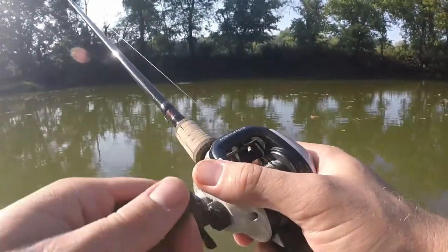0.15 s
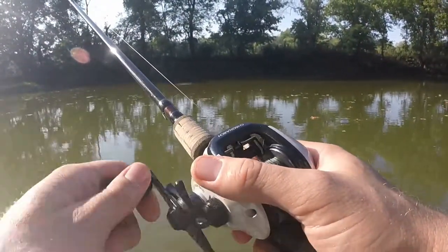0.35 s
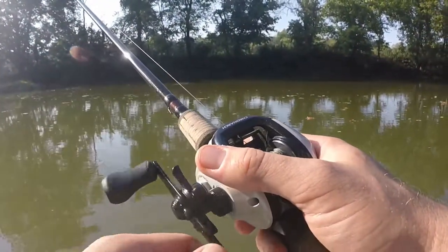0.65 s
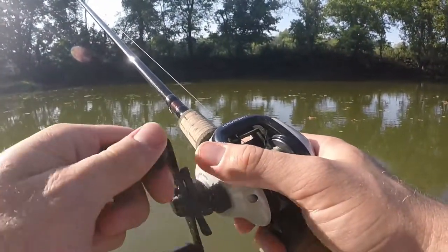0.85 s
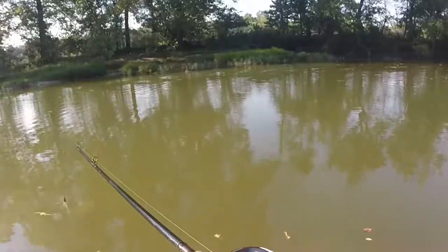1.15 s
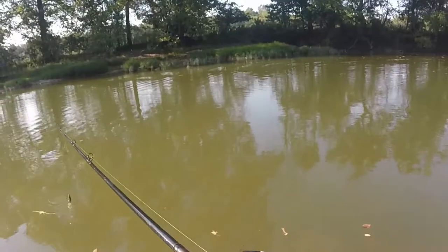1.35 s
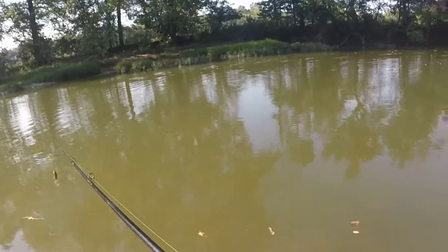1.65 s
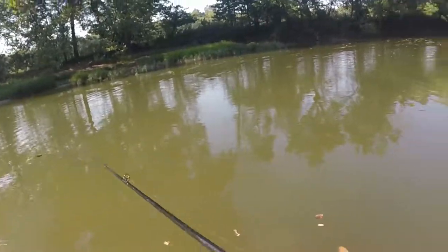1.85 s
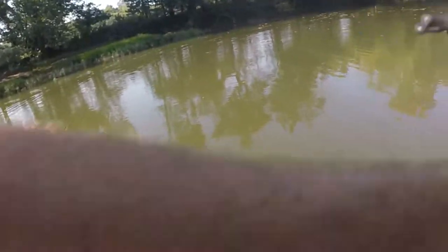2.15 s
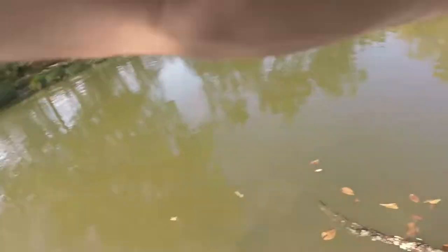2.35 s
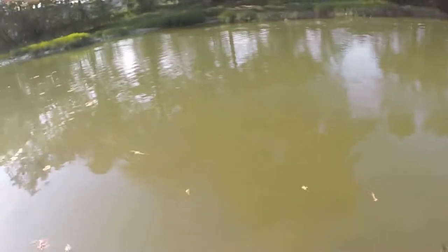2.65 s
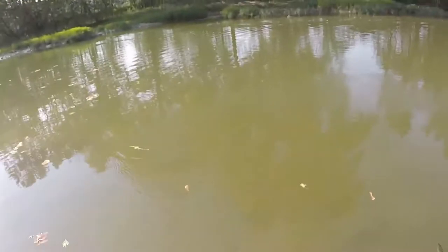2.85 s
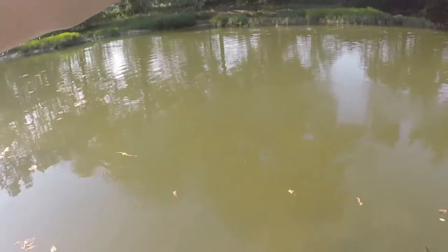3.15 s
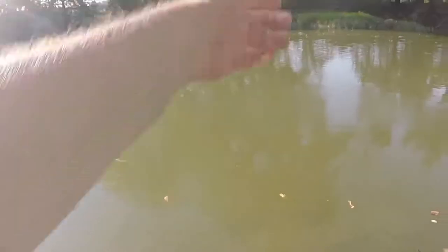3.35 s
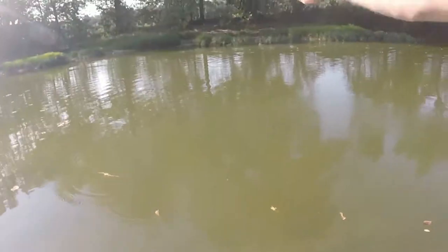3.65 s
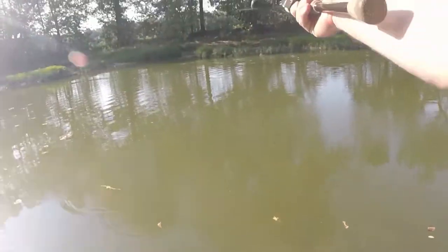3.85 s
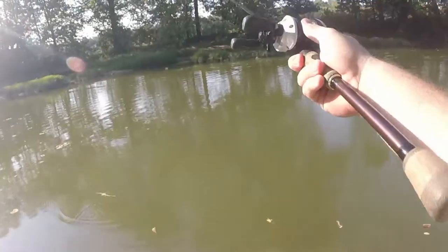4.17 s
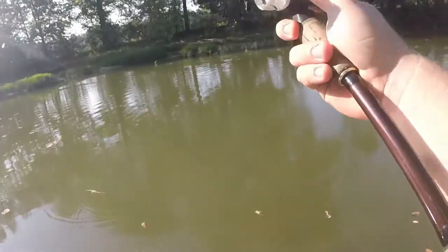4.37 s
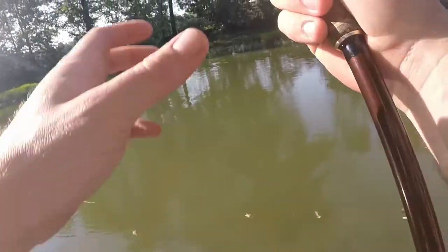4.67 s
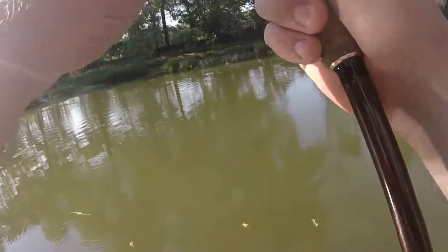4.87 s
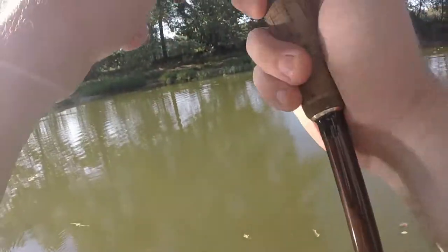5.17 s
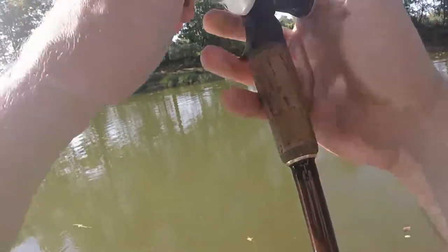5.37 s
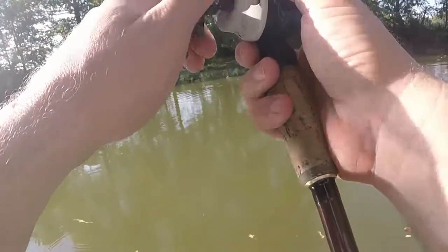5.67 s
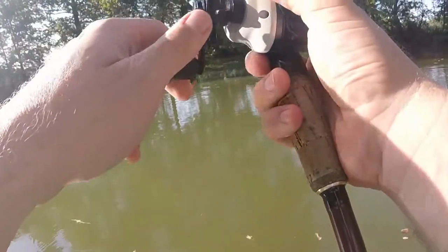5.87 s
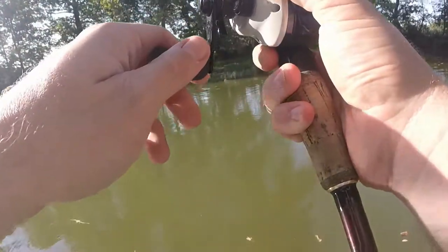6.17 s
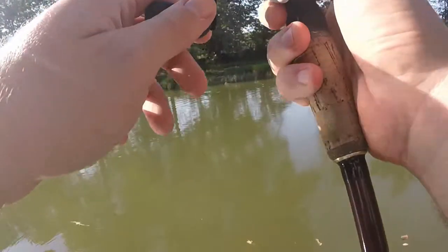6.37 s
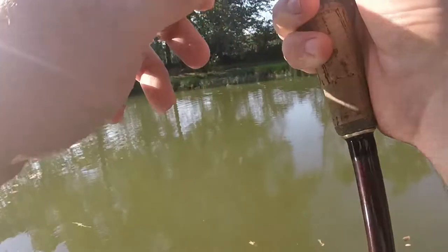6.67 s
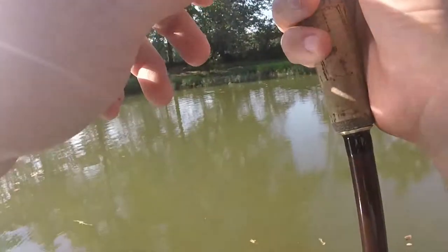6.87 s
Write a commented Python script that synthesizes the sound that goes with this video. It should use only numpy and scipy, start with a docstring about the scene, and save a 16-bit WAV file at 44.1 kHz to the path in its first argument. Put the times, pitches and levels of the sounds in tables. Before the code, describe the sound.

A fishing reel clicks sharply, then a burst of clattering bumps and cloth rub on the microphone, and the reel clicks again beside a quiet pond.

```python
"""Insects hiss near 8 kHz over the quiet floor of a still pond, while cloth rubs close on the microphone's case.
A small camera in a plastic case is strapped to an angler casting a rod: cloth, arm and buckle strike the
case, which rings in its own modes. The reel's clutch clicks off and on, each click a burst of ringing modes.
The line hisses faintly as filtered noise; far off the lure plops, a low sine gliding up.
Last, a bird gives two thin, fluttering near-sine notes."""
import sys
import numpy as np
from scipy import signal
from scipy.fft import rfft, irfft
from scipy.io import wavfile
from scipy.ndimage import uniform_filter1d

SR = 44100
rng = np.random.default_rng(int(sys.argv[2]) if len(sys.argv) > 2 else 0)


def volts(x):
    """Linear amplitude factor 10**(x/20) for a level x in dB, scalar or array-like."""
    e = np.asarray(x, float) / 20
    return 10 ** e


def pcm_store(signal):
    """Save signal as 16-bit PCM."""
    levels = np.round(np.clip(np.atleast_2d(signal), -1, 1) * 32767)
    wavfile.write(sys.argv[1], SR, levels.astype(np.int16).T)


N = 309617
T = np.arange(N) / SR  # seconds

# Distant air over the pond. Each row: frequency [Hz], relative density [dB per Hz].
AIR_SPECTRUM = [(12, -15.5), (20, 6), (70, 5), (534, -4.5), (1070, -4), (1270, -12), (6720, -23),
                (7950, -21.5), (10200, -34.5), (14300, -42.5), (15500, -72)]
# Insects across the water. Each row: centre [Hz], width [Hz], rms level before wavering [dB].
INSECT_BANDS = [(7950, 580, -71.5), (13700, 900, -104.5)]
# Cloth moving on the case. Each row: start [s], sliding speed as level [dB], pressure as level [dB].
CLOTH_MOVES = [(0.0, -65, -52), (0.116, -56, -52), (0.316, -68.5, -56), (0.72, -68, -63),
               (1.09, -74, -64.5), (1.3, -65.5, -58.5), (1.55, -59, -56), (1.9, -63, -55),
               (1.99, -53.5, -53), (2.15, -47, -49), (2.3, -46, -47), (2.46, -42, -40.5), (2.541, -48, -47),
               (2.566, -41, -32.5), (2.62, -39.5, -37), (2.67, -43.5, -39.5), (2.71, -39, -40),
               (2.76, -53, -40.5), (2.95, -57, -49), (3.08, -62, -58.5), (3.35, -54.5, -54.5),
               (3.6, -47.5, -48), (3.75, -55, -56.5), (3.9, -51.5, -54.5), (3.96, -62.5, -60),
               (4.5, -65.5, -61.5), (4.81, -62.5, -59), (5.17, -68.5, -62), (5.89, -70, -62),
               (6.4, -76, -74), (7.02, -77, -82)]
# Modes of the plastic case. Each row: frequency [Hz], relative level [dB], ring time t60 before damping [s].
CASE_MODES = [(235, -5, .04), (310, -4, .05), (470, -1, .05), (570, -1, .05), (680, -1, .06),
              (900, -1, .05), (1030, -1, .05), (1180, -3, .045), (1480, -13, .04), (1850, -3, .014),
              (2390, -1, .035), (2680, -4, .02), (3290, -5, .025), (3900, -11, .012), (4410, -17, .03),
              (4880, -12, .028), (5670, -17, .022), (6450, -21, .015), (7640, -20, .012)]
# Bumps on the case. Each row: start [s], thud peak [dB], thud centre [Hz], rattle re thud peak [dB],
# softness [ratio; stretches push and ring].
CASE_KNOCKS = [(0.217, -34, 1450, -4.5, 0.88), (0.243, -25.5, 1060, -25, 1.1), (0.263, -31, 970, -23, 1.5),
               (0.517, -33.5, 394, -21, 0.98), (0.649, -38, 398, -19, 0.91), (1.79, -31, 533, -44, 1.2),
               (2.239, -28, 587, -14, 1.3), (2.447, -25, 304, -9, 1.44), (2.558, -2, 440, -13.5, 0.92),
               (2.566, -10, 674, -4.5, 0.57), (2.578, -18.5, 270, -26, 1.2), (2.592, -12, 390, -22, 1.2),
               (2.618, -12.5, 450, -20, 0.48), (2.624, -13, 357, -18, 0.62),
               (2.640, -20.5, 990, -3.5, 0.98), (2.684, -25, 434, -18, 2.16), (2.707, -20.5, 697, -15, 1.6),
               (2.731, -16, 900, -18, 1.2), (2.753, -20.5, 1000, -24, 1.8), (2.763, -15.5, 1000, -17, 1.54),
               (2.772, -5, 900, -33, 1.67), (2.781, -24.5, 1020, -11, 1.2), (2.790, -21, 950, -26, 1.8),
               (2.796, -18, 800, -26, 0.83), (2.819, -17, 855, -26, 1.44), (2.841, -32, 700, -24, 1.9),
               (2.858, -8, 690, -31, 1.35), (2.882, -18.5, 610, -30, 1.4), (2.893, -30, 1050, -30, 1.9),
               (2.915, -25, 504, -25, 2.6), (2.928, -13, 676, -23.5, 1.49), (2.949, -18, 920, -30, 1.2),
               (2.965, -29.5, 544, -36, 1.6), (2.988, -33, 970, -26, 1.8), (3.055, -35, 1060, -27, 1.7),
               (3.126, -25, 510, -22, 1.45), (3.138, -21, 870, -14, 1.3), (3.162, -36.5, 840, -22, 1.3),
               (3.225, -22, 745, -12.5, 2.08), (3.876, -38.5, 680, -9, 1.8), (4.218, -32, 665, -16.5, 0.96),
               (4.304, -28, 1560, -23, 1.47)]
# Dry ticks of a buckle on the case. Each row: start [s], thud peak [dB].
BUCKLE_TICKS = [(2.600, -36.5), (2.691, -43), (2.778, -43.5), (2.844, -57), (3.734, -55), (3.749, -50)]
# Modes of the reel. Each row: frequency [Hz], relative level [dB], ring time t60 before damping [s].
REEL_MODES = [(466, 0, .02), (645, 13, 0.019), (997, 17, 0.017), (1180, -4, 0.075), (1440, 8, 0.013),
              (1900, -4.5, 0.01), (2270, 2.5, 0.039), (2780, -1.5, 0.056), (3140, 11, 0.011),
              (3697, 14.5, 0.0057), (4610, -0.5, 0.028), (5816, 13.5, 0.0088), (6456, 3.5, 0.028),
              (7560, 5.5, 0.028), (8440, -8, .008), (9770, 15.5, 0.028)]
# Clicks in the reel. Each row: start [s], thud peak [dB], rattle re thud peak [dB], top tick re thud peak [dB].
REEL_CLICKS = [(1.853, -38, -21, -35), (1.938, -9.5, -9, -35), (1.942, -28.5, -7, -30),
               (1.981, -53, 0, -24), (1.993, -43, -9, -30), (5.024, -37.5, -17, -34), (5.094, -34, -3, -13),
               (5.102, -24.5, -12, -16), (5.109, -36, -5, -10), (5.113, -23, -10, -28),
               (5.1165, -6.5, -12, -12.5), (5.123, -30.5, -12, -27), (5.204, -40, -13.5, -33),
               (5.381, -36, -18, -41), (5.4, -31.5, -25, -43), (5.540, -27.5, -20, -20.5),
               (5.793, -37, -28, -37), (5.879, -33.5, -29, -37)]
# The lure's distant bubble. Each row: frequency [Hz], level before decay [dB], t60 [s], rise [Hz per s].
LURE_BUBBLE = [(320, -43, 0.19, 59.6)]
# The bird's two notes. Each note's rows: time [s], pitch before flutter [Hz], rms level before flutter [dB].
BIRD_NOTES = [
    [(6.155, 7300, -78), (6.18, 7950, -63), (6.235, 7900, -65), (6.27, 8020, -60), (6.33, 7980, -73)],
    [(6.375, 7670, -69), (6.445, 7670, -71), (6.46, 7250, -69), (6.472, 6600, -77)],
]

SPLIT_HZ = 1650  # low modes below, middle and top modes above


def band(x, lo_hz, hi_hz, order=2):
    """Band-pass, scaled to rms 1."""
    sos = signal.butter(order, [lo_hz, hi_hz], "band", fs=SR, output="sos")
    y = signal.sosfilt(sos, x)
    return y / np.std(y)


def walk(count):
    """Wandering random level: count fresh draws a second, smoothed twice."""
    k = SR // count
    steps = np.repeat(rng.standard_normal(N // k + 1), k)
    return 1.3 * uniform_filter1d(uniform_filter1d(steps, k), k)[:N]


def pond():
    """Smooth distant air is shaped noise; the insects are two wavering noise bands."""
    air_db = -54.5  # rms
    hz, db = np.transpose(AIR_SPECTRUM)
    f = np.maximum(np.fft.rfftfreq(N, 1 / SR), 1)
    shape = volts(np.interp(np.log(f), np.log(hz), db))
    air = irfft(rfft(rng.standard_normal(N)) * shape, N)
    out = volts(air_db) * air / np.std(air)
    for mid, width, level_db in INSECT_BANDS:
        hiss = band(rng.standard_normal(N), mid - width / 2, mid + width / 2)
        out = out + hiss * volts(level_db + 0.49 * walk(count=3))
    return out


def rub():
    """Dense fibre slips drive the case modes; speed sets the hiss, pressure the low modes and the thump of air."""
    hum_hz = 800  # modes below rumble, those from here to SPLIT_HZ hum
    hum_db, rumble_db = -0.6, -1  # re pressure
    slow_slide_db, fizz_per_db = -51, -0.83  # slope of the fizz re the sliding level
    thump_db, hard_press_db, thump_per_db = -25, -33, 2.5  # hard pressure jolts the air most
    breeze_db = -62.5  # the breeze thumps on its own
    s, *cols = np.transpose(CLOTH_MOVES)
    slide_db, press_db = (np.interp(T, s, c) for c in cols)

    slip_db = 2.3 * rng.exponential(size=N) + 1.6 * walk(count=80) + 0.91 * walk(count=16)
    slips = rng.standard_normal(N) * volts(slip_db)
    # a mode's width follows from its ring time
    rung = np.array([volts(db) * band(slips, hz - 2.4 / t60, hz + 2.4 / t60) for hz, db, t60 in CASE_MODES])
    group = np.digitize(np.transpose(CASE_MODES)[0], [hum_hz, SPLIT_HZ])
    low, mid, high = (rung[group == g].sum(0) for g in range(3))
    rumble = volts(rumble_db) * low / np.std(low)
    hum = volts(hum_db) * mid / np.std(mid)

    weave = slips * rng.choice([-1, 1], N)  # the cloth's own broad hiss, in step with the slips
    hiss = high / np.std(high)
    hiss = hiss + volts(-3) * band(weave, 1780, 3200, order=3)
    hiss = hiss + volts(-11.5) * band(weave, 3800, 6370)
    fizz = volts(-19.5 + fizz_per_db * (slide_db - slow_slide_db)) * band(slips, 6900, 11000)

    thump = band(rng.standard_normal(N), 11, 260, order=1) * volts(1.8 * walk(count=9))
    press_thump = volts(thump_db + thump_per_db * (press_db - hard_press_db))
    grip = volts(press_db + 1.43 * walk(count=45))  # the low modes come in uneven tugs
    return grip * (rumble + hum) + volts(slide_db) * (hiss + fizz) + np.hypot(press_thump, volts(breeze_db)) * thump


def strike(events, modes, tick_hz, thud_oct, push_s, scrape_s, damp, top_damp):
    """A soft push rings the low modes near the thud centre; a short scrape rings the middle and top modes."""
    hz, db, t60 = np.transpose(modes)[:, :, None]
    t, out = T[:SR // 10], np.zeros(N + SR)
    group = np.digitize(hz[:, 0], [SPLIT_HZ, tick_hz])
    octaves = np.log2(np.maximum(hz / SPLIT_HZ, 1))
    t60 = t60 * np.where(hz < SPLIT_HZ, damp, top_damp)  # hand and chest damp the ringing
    for s, peak_db, thud_hz, tilt_db, rattle_db, tick_db, ring in events:
        decay = np.exp(-np.log(1000) * t / (t60 * ring))
        rings = volts(db + tilt_db * octaves) * decay * np.sin(2 * np.pi * hz * (t - push_s))
        # a longer-ringing blow excites fewer modes around its centre
        near = np.exp(-(np.log2(hz / thud_hz) / thud_oct * ring) ** 2 / 2)
        push = 1 - np.exp(-(t / (push_s * ring)) ** 2)
        thud = (near * rings)[group == 0].sum(0) * push
        hit = thud / np.abs(thud).max()
        fade = np.exp(-t / scrape_s) + volts(-22.0) * np.exp(-t / (4 * scrape_s))
        scrape = rng.standard_normal(len(t)) * t * np.minimum(t / scrape_s, 1) * fade
        for g, level_db in ((1, rattle_db), (2, tick_db)):
            part = signal.fftconvolve(rings[group == g].sum(0), scrape)[:len(t)]
            hit = hit + volts(level_db) * part / np.std(part[:SR // 200])  # level set over the first 5 ms
        i = int(s * SR)
        out[i:i + len(t)] += volts(peak_db) * hit
    return out[:N]


def case_hits():
    """Bumps and buckle ticks ring the case close to the microphone; softer bumps lose top."""
    tilt_db = -13.5  # per octave above SPLIT_HZ, for a blunt contact
    knock_top_db, soft_top_db = -12, -5  # top tick re rattle; its change per unit of softness above 1
    events = []
    for s, db, hz, rattle_db, soft in CASE_KNOCKS:
        top_db = rattle_db + knock_top_db + soft_top_db * (soft - 1)
        events.append((s, db, hz, tilt_db, rattle_db, top_db, soft))
    for s, db in BUCKLE_TICKS:
        # nearly all rattle (6.5 dB) and top (6 dB), re a 900 Hz thud
        events.append((s, db, 900, tilt_db, 6.5, 6, 1))
    return strike(events, CASE_MODES, tick_hz=3800, thud_oct=0.5, push_s=0.001576, scrape_s=0.00053,
                  damp=0.29, top_damp=0.27)


def reel_clicks():
    """The thumb bar trips the clutch before the cast and the handle's cam after it; each rings the reel."""
    cast_s, ring = 2.5, 1.44
    thumb_bar, handle_cam = (850, 4.4), (1100, -4)  # thud Hz, dB per octave above SPLIT_HZ
    events = []
    for s, db, rattle_db, tick_db in REEL_CLICKS:
        thud_hz, tilt_db = thumb_bar if s < cast_s else handle_cam
        events.append((s, db, thud_hz, tilt_db, rattle_db, tick_db, ring))
    return strike(events, REEL_MODES, tick_hz=7000, thud_oct=0.63, push_s=0.001, scrape_s=0.00034,
                  damp=0.44, top_damp=0.31)


def line():
    """The line running out through the guides hisses faintly at the very top."""
    swell = np.interp(T, (2.7, 4.0, 4.7), [0, 1, 0]) ** .5  # start, fullest and end in seconds
    return volts(-80 + 1.5 * walk(count=6)) * swell * band(rng.standard_normal(N), 12800, 15000)


def plop():
    """The bubble left by the distant lure rings low and glides up."""
    (hz, db, t60, rise), = LURE_BUBBLE
    t = np.maximum(T - 4.703, 0)  # seconds since the bubble starts
    onset = np.minimum(t / .006, 1)
    decay = np.exp(-np.log(1000) * t / t60)
    return volts(db) * onset * decay * np.sin(2 * np.pi * t * (hz + rise * t / 2))


def bird():
    """Two near-sine notes whose pitch and level flutter at random."""
    out = 0
    for note in BIRD_NOTES:
        s, hz, db = np.transpose(note)
        gate = uniform_filter1d(1. * ((T > s[0]) & (T < s[-1])), size=300)
        level = volts(np.interp(T, s, db) + 3.5 * walk(count=70))
        pitch = np.interp(T, s, hz) + 35 * walk(count=60)
        out = out + np.sqrt(2) * gate * level * np.sin(2 * np.pi * np.cumsum(pitch) / SR)
    return out


def scene():
    """All sources as they reach the case."""
    # the hits carry little bass and little extreme treble
    sos = signal.butter(3, [160, 10500], "band", fs=SR, output="sos")
    hits = signal.sosfilt(sos, case_hits() + reel_clicks())
    return (pond() + rub() + hits + line() + plop() + bird())[None]


def roll_off(x):
    """The treble ends steeply here."""
    return signal.sosfilt(signal.butter(12, 16510, fs=SR, output="sos"), x)


def record(dry):
    """The microphone signal loses its top above 15.6 kHz and is clipped just under full scale."""
    dull = signal.sosfilt(signal.ellip(8, .2, 60, 15600, fs=SR, output="sos"), dry)
    mix = np.clip(dull, -.985, .985)
    return roll_off(mix)


dry = scene()
out = record(dry)
pcm_store(out)
```